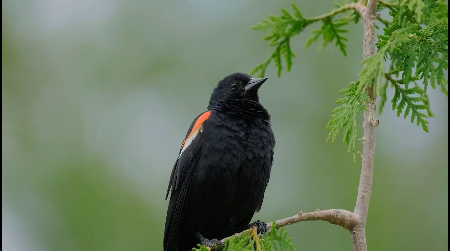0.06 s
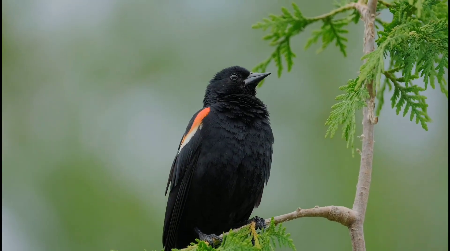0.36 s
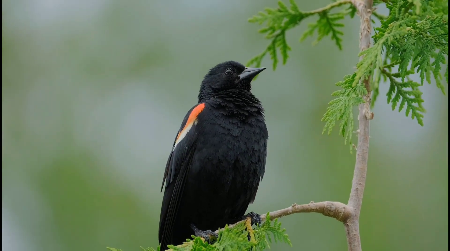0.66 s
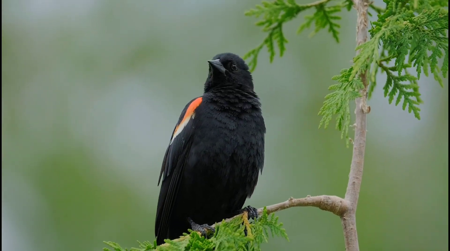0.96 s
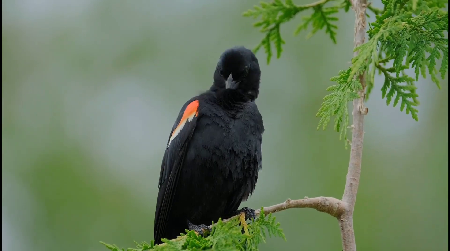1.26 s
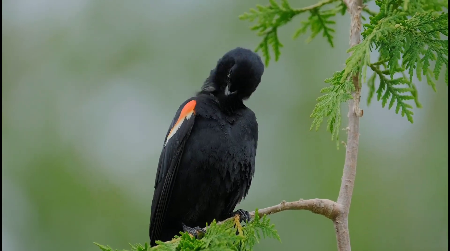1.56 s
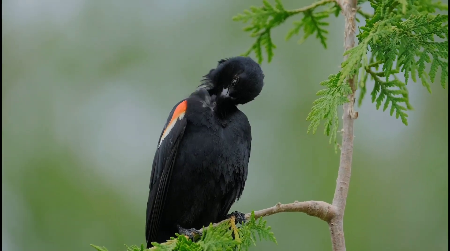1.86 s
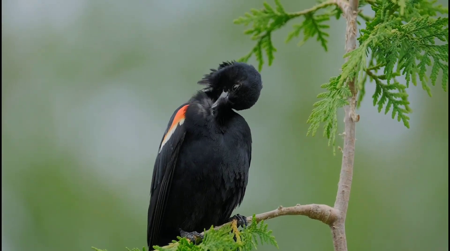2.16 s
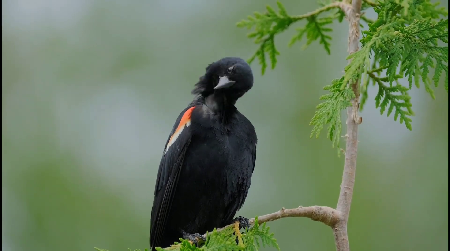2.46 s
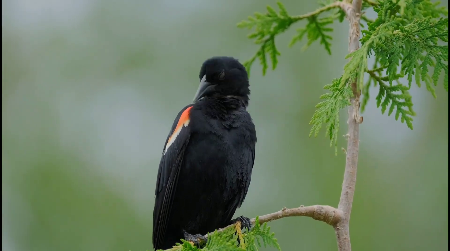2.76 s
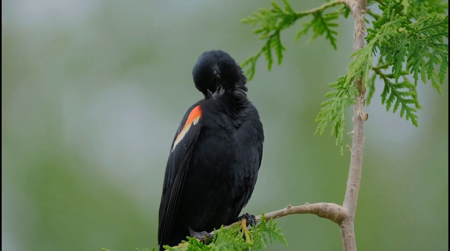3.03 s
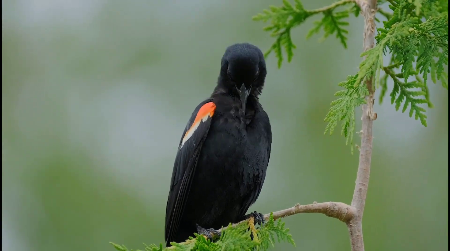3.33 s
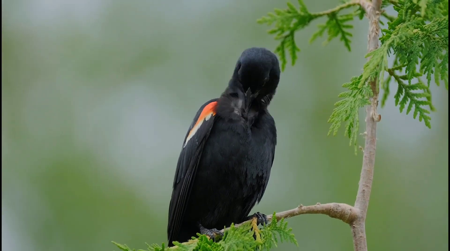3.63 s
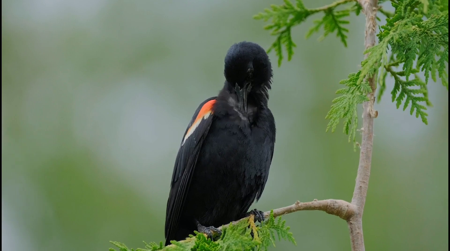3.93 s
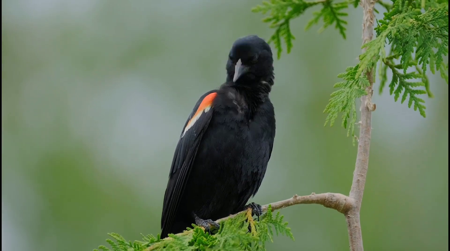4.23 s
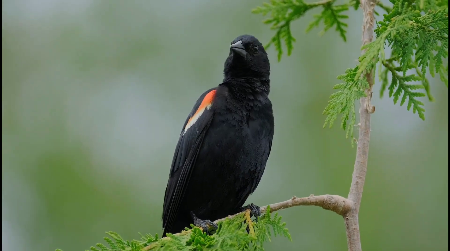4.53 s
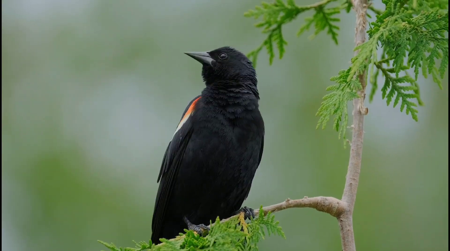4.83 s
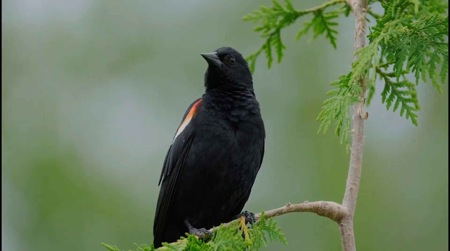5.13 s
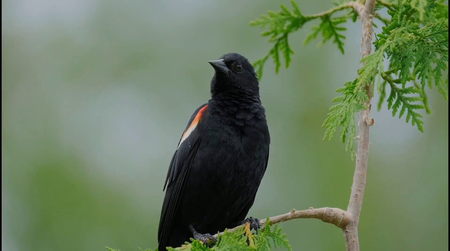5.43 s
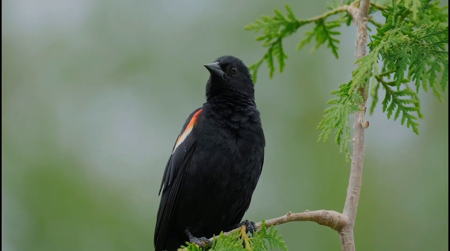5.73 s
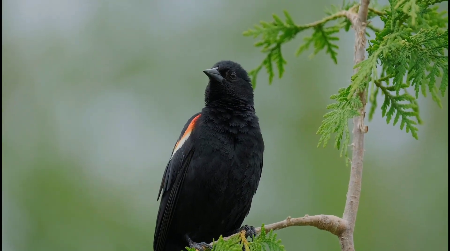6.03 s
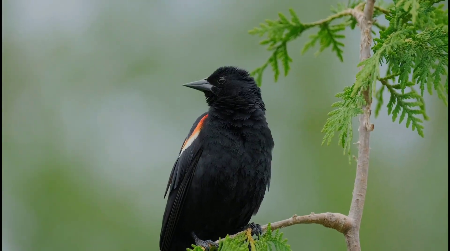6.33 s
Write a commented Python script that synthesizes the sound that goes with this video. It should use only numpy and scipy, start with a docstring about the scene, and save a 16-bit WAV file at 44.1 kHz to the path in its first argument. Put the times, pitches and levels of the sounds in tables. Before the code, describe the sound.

A blackbird sings close to the microphone outdoors. It opens with a two-toned note and a quick run of nasal calls, then moves through arched chirps, clear whistles, short rasps and two high falling slurs. A buzz lifts into a burst of loud chirps, followed by more whistles and rasps. A few faint scratchy chips end the song, over a faint steady hiss with a slight echo from the trees.

```python
"""A two-voiced note and a run of nasal calls open a songbird's song, close by over a faint outdoor hiss.
Arched chirps, whistles, rasps, high falling slurs, a buzz, slides and a few faint chips follow.
The two sides of its syrinx are oscillators driven by air: alone each gives a nearly pure tone,
together they beat and make combination tones. Ground, branches and trees return weak reflections;
the recorder rounds the peaks and cuts the bass."""
import sys
import numpy as np
from scipy import signal
from scipy.fft import rfft, irfft, next_fast_len
from scipy.io import wavfile
from scipy.ndimage import uniform_filter1d, map_coordinates

SR = 44100
rng = np.random.default_rng(int(sys.argv[2]) if len(sys.argv) > 2 else 0)


def persist_wave(psi):
    """Save psi, clipped to +-1, as 16-bit WAV."""
    counts = np.round(np.clip(psi, -1, 1) * 32767).astype(np.int16)
    wavfile.write(sys.argv[1], SR, np.atleast_2d(counts).T)


N = 290619


def amp(db):
    """Amplitude ratio of a level in decibels."""
    return 10 ** (np.asarray(db) / 20)


def along(points, hz):
    """Interpolation of (frequency, value) points on a logarithmic frequency axis."""
    frequencies, values = np.transpose(points)
    return np.interp(np.log(hz + 1), np.log(frequencies), values)


def contours(rows, t):
    """Interpolation of each column after the time, smoothed by a 3 ms moving average."""
    times, *columns = np.transpose(rows)
    return [uniform_filter1d(np.interp(t, times, column), size=130) for column in columns]


def wobble(t, rate):
    """Low-pass noise: a spline through rate random knots a second."""
    position = (t - t[0]) * rate
    return map_coordinates(rng.standard_normal(int(position[-1]) + 4), [position])


def filtered(x, response):
    """Linear filtering: the spectrum of x times a frequency response."""
    size = next_fast_len(N + SR // 2)
    return irfft(rfft(x, size) * response(np.fft.rfftfreq(size, 1 / SR)), size)[:N]


def gate(t, start, end, edge):
    """Window with raised-cosine edges centred on start and end."""
    u = np.clip(np.minimum(t - start, end - t) / edge + .5, 0, 1)
    return np.sin(np.pi / 2 * u) ** 2


def span(start, length):
    """Sample times of a note, and its progress from 0 to 1."""
    t = np.arange(max(int(start * SR), 0), min(int((start + length) * SR), N)) / SR
    return t, np.linspace(0, 1, len(t))


def arch(u, crest, rise, fall, bend_up=2, bend_down=2):
    """Power-law arch: zero at the crest, lower by rise at the start and by fall at the end."""
    before = np.maximum(1 - u / crest, 0)
    after = np.maximum((u - crest) / (1 - crest), 0)
    return -rise * before ** bend_up - fall * after ** bend_down


# Spectrum of the outdoor hiss: (frequency [Hz], relative spectral level [dB])
AIR_SPECTRUM = [(59, -68.5), (100, -39), (552, -29.5), (600, -34.5), (995, -19.5), (1180, -21),
                (1580, -6.5), (2570, -4.5), (2980, -3.5), (3310, -7), (4090, -6), (4450, -7.5), (9900, -7),
                (13600, -10.5), (15400, -18.5)]
def air(level_db=-64.37, drift_db=0.36):
    """Spectrally shaped Gaussian noise makes a faint, nearly steady hiss."""
    hiss = filtered(rng.standard_normal(N), lambda hz: amp(along(AIR_SPECTRUM, hz)))
    return hiss / hiss.std() * amp(level_db + drift_db * wobble(np.arange(N) / SR, 1))


# Warbles imposed on whichever note is sounding:
# (first crest [s], end [s], first rate [Hz], last rate [Hz], pitch swing [Hz], level swing [dB])
WARBLES = [(1.033, 1.082, 127, 51, 220, 10.5), (2.299, 2.345, 48, 100, 321.7, 5.5),
           (2.424, 2.472, 128, 84, 340, 5), (2.54, 2.59, 130, 120, 310, 2),
           (2.672, 2.702, 140, 102, 300, -10), (2.943, 2.99, 136, 112, 300, -9.5),
           (3.196, 3.368, 207, 180, 175.5, 4), (4.796, 4.875, 57, 92, 515, 4),
           (6.014, 6.073, 300, 273, 80, 2)]
def warble(t, fade_share=0.94):
    """Frequency and amplitude modulation by the fast muscles of the syrinx starts at once and eases off."""
    hz, db = np.zeros(len(t)), np.zeros(len(t))
    for start, end, first_rate, last_rate, swing_hz, swing_db in WARBLES:
        age, length = t - start, end - start
        cycle = np.cos(2 * np.pi * age * (first_rate + (last_rate - first_rate) * age / length / 2))
        easing = np.clip((end - t) / (fade_share * length) + .5, 0, 1)
        depth = easing * gate(t, start - .002, end + length, edge=0.0072)
        hz += swing_hz * depth * cycle
        db += depth * (swing_db * cycle - 0.07 * abs(swing_db))
    return hz, db


def membrane(t, hz, db, rough, flutter_db=0.9):
    """Phase and amplitude of one side of the syrinx; jitter and shimmer are heard as roughness."""
    swing_hz, swing_db = warble(t)
    jitter = rough * (0.82 * wobble(t, 1800) + .45 * wobble(t, 220)) + .002 * wobble(t, 99)
    pitch = (hz + swing_hz) * (1 + jitter)
    unsteady_db = flutter_db * wobble(t, 64) + 22 * rough * wobble(t, 290)
    shimmer = 2.9 * rough * wobble(t, 1700)
    return 2 * np.pi * np.cumsum(pitch) / SR, amp(db + swing_db + unsteady_db) * (1 + shimmer)


# Harmonics and combination tones: (multiple of low pitch [1], multiple of high pitch [1], weight [dB])
COMBINATIONS = [(2, 0, 1), (0, 2, -13.5), (1, 1, -2), (-1, 2, -8.5), (2, -1, -17.5), (3, -1, -15.5),
                (-2, 3, -12.5), (-1, 1, -5.5), (4, 0, -23)]
def note(t, sides, overtone_db, rough, third_db=-27, edge_s=0.0022):
    """Nonlinear oscillation: one side makes harmonics; two, sharing an air stream, intermodulate."""
    low_phase, low_size = membrane(t, *sides[0], rough)  # a side is (pitch [Hz], level [dB])
    tone = low_size * np.sin(low_phase)
    if len(sides) == 1:
        overtones = low_size * (np.sin(2 * low_phase) + amp(third_db) * np.sin(3 * low_phase))
    else:
        high_phase, high_size = membrane(t, *sides[1], rough)
        tone = tone + high_size * np.sin(high_phase)
        overtones = np.zeros(len(t))
        for m, n, db in COMBINATIONS:
            share = abs(m) / (abs(m) + abs(n))
            size = amp(db) * abs(low_size) ** share * abs(high_size) ** (1 - share)
            overtones += size * np.sin(m * low_phase + n * high_phase + 2 * np.pi * rng.random())
    rush = 1 + 2.5 * amp(overtone_db)  # a tighter syrinx hisses more
    turbulence = tone * rush * rng.standard_normal(len(t))
    edges = gate(t, t[0] + edge_s / 2, t[-1] - edge_s / 2, edge_s)
    return round(t[0] * SR), np.array([tone, amp(overtone_db) * overtones, turbulence]) * edges


# Response of the windpipe to the overtones: (frequency [Hz], gain [dB])
WINDPIPE = [(700, -41), (1500, -8.5), (3500, 8), (4800, 5), (6000, -10.5), (8000, -4), (11000, -7.5),
            (15000, -28.5)]
# Spectrum of air rushing through the syrinx: (frequency [Hz], relative spectral level [dB])
TURBULENCE = [(1000, -12.5), (2500, 2), (5000, -1.5), (8000, -4), (12500, -16.5), (15000, -20)]
def sing(notes, turbulence_db):
    """Source and filter: the notes add up, the windpipe colours their overtones, and the turbulence takes its
    own spectrum."""
    layers = np.zeros((3, N))
    for first_sample, sound in notes:
        layers[:, first_sample:first_sample + sound.shape[1]] += sound
    tone, overtones, turbulence = layers
    overtones = filtered(overtones, lambda hz: amp(along(WINDPIPE, hz)))
    turbulence = filtered(turbulence, lambda hz: amp(turbulence_db + along(TURBULENCE, hz)))
    return tone + overtones + turbulence


def slide(rows, gain_db, overtone_db, rough, bite_db=0, bite_s=0.02):
    """Glissando of one side or both; the bite is an onset transient of overtones."""
    t, _ = span(rows[0][0], rows[-1][0] - rows[0][0])
    controls = contours(rows, t)
    sides = [(hz, db + gain_db) for hz, db in zip(controls[::2], controls[1::2])]
    return note(t, sides, overtone_db + bite_db * np.exp((t[0] - t) / bite_s), rough)


# Two-voiced contour:
# (time [s], low pitch [Hz], low relative level [dB], high pitch [Hz], high relative level [dB])
OPENING = [(0, 3420, -22, 5056, -27), (.028, 3178, -26, 5125, -31.5), (.062, 3110, -21.5, 5024, -27),
           (.095, 3260, -21.5, 4780, -28.5), (.11, 3670, -29.5, 3710, -32)]
def opening_note():
    """Biphonation: the two sides start far apart and close in on one pitch."""
    return slide(OPENING, gain_db=1, overtone_db=-25, rough=.004)


def ground(song, gain_db=-30, delay_s=.014):
    """Reflection: the ground returns a faint copy, delayed by the longer path."""
    return amp(gain_db) * np.pad(song, (int(delay_s * SR), 0))[:N]


def branches(song, gain_db=-36, t60_s=.3, centre_hz=3500, half_width_hz=900):
    """Early scattering: nearby branches return a short flutter in the range of the chirps."""
    t = np.arange(SR // 2) / SR
    impulse = rng.standard_normal(len(t)) * amp(-60 * t / t60_s) * gate(t, 0.013, 1, edge=.01)
    scattered = signal.fftconvolve(song, impulse / np.linalg.norm(impulse))[:N]
    return filtered(scattered, lambda hz: amp(gain_db) / (1 + ((hz - centre_hz) / half_width_hz) ** 4))


# Decay among the foliage: (frequency [Hz], reverberation time [s])
FOLIAGE_DECAY = [(1500, 0.33), (3500, 1), (8000, 0.031)]
def trees(song, tail_db=-37, echo_db=-42, echo_s=.243, cutoff_hz=4600):
    """Reverberation and echo: foliage scatters a tail and far trees reflect once, both with less treble."""
    hz, t, spectra = signal.stft(rng.standard_normal(SR), SR, nperseg=256)
    decay = amp(-60 * t / along(FOLIAGE_DECAY, hz)[:, None])
    _, tail = signal.istft(spectra * decay, SR, nperseg=256)
    scattered = signal.fftconvolve(song, tail / np.linalg.norm(tail))[:N]
    echo = np.pad(song, (int(echo_s * SR), 0))[:N]
    returned = amp(tail_db) * scattered + amp(echo_db) * echo
    return filtered(returned, lambda f: 1 / np.sqrt(1 + (f / cutoff_hz) ** 6))


def held(t, hz, db, attack_s, bend_share, scoop_s=0.0064, drop_s=0.0047, release_s=0.0069):
    """Onset and release transients: pitch and level scoop up into a held note and drop out of it."""
    age, left = t - t[0], t[-1] - t
    bend = 0.14 * np.exp(-age / scoop_s) + 0.24 * np.exp(-left / drop_s)
    edge_loss_db = 24 * np.exp(-age / attack_s) + 16.5 * np.exp(-left / release_s)
    return hz * (1 - bend_share * bend), db - edge_loss_db


# Nasal notes, with pitches and levels at mid-note:
# (start [s], length [s], low pitch [Hz], low climb [Hz], high pitch [Hz], high climb [Hz],
#  low level [dB], low swell [dB], high level [dB], high fade [dB], overtone gain [dB])
NASALS = [ (0.159, 0.081, 2220, 648.5, 3186, 1166, -30, 11, -19, 5, -19),
          (0.279, 0.092, 2302, 151, 2936, 295, -36, 20, -26, 7, -7),
          (0.405, 0.091, 2380, 54.5, 3007, 340, -31.5, 16, -30.5, 0, -5.5),
          (0.537, 0.096, 2422, 72, 3085, 120, -35, 0, -39, 4, -5),
          (0.674, 0.11, 2433, -12, 3080, 128, -46.5, -1, -52, 8, -11)]
def nasals(attack_s=0.0042, tighten_db=7, flick_share=0.026, flick_db=3, flick_lead_s=.013, flick_s=0.0067):
    """Combination tones give a nasal timbre; the weight shifts to the low side before a last flick up."""
    for (start, length, low_hz, low_climb, high_hz, high_climb,
         low_db, swell_db, high_db, fade_db, overtone_db) in NASALS:
        t, u = span(start, length)
        u = u - .5  # progress counted from mid-note
        push = np.exp(-((t[-1] - flick_lead_s - t) / flick_s) ** 2)
        low_pitch = low_hz + low_climb * u
        high_pitch = (high_hz + high_climb * u) * (1 + flick_share * push)
        low = held(t, low_pitch, low_db + swell_db * u + flick_db * push, attack_s, bend_share=0.83)
        high = held(t, high_pitch, high_db - fade_db * u + flick_db * push, attack_s, bend_share=1.1)
        yield note(t, [low, high], overtone_db + tighten_db * u, rough=.008)


# Arched chirps: (start [s], length [s], crest pitch [Hz], crest position [0-1], rise [Hz], fall [Hz],
#  level [dB], loudest position [0-1], swell [dB], overtone gain [dB])
CHIRPS = [ (0.829, 0.1, 3740, 0.64, 1196, 986, -42.5, 0.69, 28, -26),
          (1.37, 0.035, 3040, .1, 50, 350, -63.5, 0.69, 7, -36),
          (1.562, 0.019, 4700, .05, 50, 550, -60, 0.54, 13, -36),
          (1.685, 0.078, 3776, 0.35, 420, 825, -32, .68, 39, -41),
          (1.845, .084, 3750, .31, 635, 1060, -22.5, 0.59, 42.5, -37),
          (3.503, 0.049, 3680, 0.28, 599, 1700, -9, 0.35, 23, -34.5),
          (3.584, .06, 3569, .25, 406.5, 1275, -10, 0.35, 15, -34),
          (3.676, .088, 3734, 0.37, 466, 552, -9.5, 0.61, 17, -39),
          (4.183, 0.088, 3760, .43, 463, 833, -15.5, 0.56, 28, -39),
          (4.313, 0.086, 3664, 0.45, 283, 955, -15.5, 0.63, 27, -37),
          (4.744, 0.052, 3034, 0.51, 644, 850, -25, 0.66, 3, -10.5),
          (6.057, 0.11, 3488, .41, 101, 670, -38, 0.68, 9, -36)]
def chirps(fade_db=28, collapse_db=11.5, collapse_rough=0.029):
    """Frequency sweep of one side: pitch and level arch, and the tone turns harsh as its pitch collapses."""
    for start, length, hz, crest, rise, fall, db, loudest, swell_db, overtone_db in CHIRPS:
        t, u = span(start, length)
        pitch = hz + arch(u, crest, rise, fall, bend_down=2.5)
        level = db + arch(u, loudest, swell_db, fade_db, bend_up=1.4, bend_down=3.3)
        collapse = u ** 6
        rough = 0.0005 + collapse_rough * collapse
        yield note(t, [(pitch, level)], overtone_db + collapse_db * collapse, rough)


# Drawn-out whistles: (start [s], length [s], first pitch [Hz], last pitch [Hz],
#  level [dB], fade [dB], attack time [s], overtone gain [dB])
WHISTLES = [ (1.021, 0.076, 2360, 2670, -61.5, -3, 0.007, -30),
            (1.089, .13, 2770, 2400, -51.5, 21.5, 0.0072, -33),
            (1.997, 0.23, 2702, 2410, -22.5, 1.5, .034, -41),
            (4.451, .202, 2763, 2453, -20.5, 4.5, 0.015, -40.5)]
def whistles(waver_share=0.0041, waver_per_s=28):
    """Nearly sinusoidal oscillation of one side, wavering a little on a linear glide."""
    for start, length, first_hz, last_hz, db, fade_db, attack_s, overtone_db in WHISTLES:
        t, u = span(start, length)
        glide = (first_hz + (last_hz - first_hz) * u) * (1 + waver_share * wobble(t, waver_per_s))
        side = held(t, glide, db - fade_db * u ** 2, attack_s, bend_share=.45)
        yield note(t, [side], overtone_db, rough=.001)


# Short harsh notes: (start [s], length [s], crest position [0-1], low crest [Hz], high crest [Hz],
#  low sag [share of pitch], low level [dB], high level [dB], low loudest position [0-1],
#  high loudest position [0-1], overtone gain [dB], roughness [0-1])
RASPS = [ (2.287, 0.065, .03, 2397, 4000, .33, -32.5, -25.5, 0.18, 0.26, -22.5, 0.05),
         (2.403, 0.064, 0.26, 2515, 4350, 0.18, -24, -26, 0.42, 0.092, -24, 0.03),
         (2.514, 0.074, .33, 2901, 4650, .22, -18, -20, 0.5, 0.082, -22.5, .02),
         (3.803, 0.089, .45, 1836, 3550, .08, -36, -30, 0.6, 0.22, -24.5, .03),
         (4.703, 0.047, 0.72, 2370, 3500, .05, -39.5, -26, 0.74, 0.92, -5.5, 0.08),
         (4.784, 0.091, 0.087, 2788, 3900, .2, -27, -30, .25, 0.064, -11, 0.08),
         (4.959, 0.053, 0.69, 2413, 3480, .03, -37, -26, 0.63, 0.85, -1.5, 0.06),
         (5.99, 0.074, 0.07, 1965, 3950, 0.12, -56, -37.5, 0.34, 0.75, -32, 0.03)]
def rasps(rise_share=.42, high_sag_ratio=1.8, swell_db=40.5, fade_db=20):
    """Aperiodic vibration: both sides sweep roughly to a crest and sag, each swelling in its own time."""
    for (start, length, crest, low_hz, high_hz, sag,
         low_db, high_db, low_at, high_at, overtone_db, rough) in RASPS:
        t, u = span(start, length)
        low = low_hz * (1 + arch(u, crest, rise_share, sag, bend_up=0.55, bend_down=1.4))
        high_sag = high_sag_ratio * sag
        high = high_hz * (1 + arch(u, crest, rise_share, high_sag, bend_up=0.94, bend_down=0.77))
        low_level = low_db + arch(u, low_at, swell_db, fade_db, bend_down=2.6)
        high_level = high_db + arch(u, high_at, swell_db, fade_db, bend_down=1.3)
        yield note(t, [(low, low_level), (high, high_level)], overtone_db, rough)


# Contour shared by the slurs:
# (time since the sides meet [s], low pitch [Hz], low relative level [dB], high relative level [dB])
SLUR_CONTOUR = [(-.105, 4806, -73, -48), (-.088, 5000, -58.5, -39), (-.055, 4950, -52.5, -30.5),
                (-.038, 4397, -29, -24.5), (-.016, 4210, -14, -18), (.006, 4300, -23.5, -40.5),
                (.032, 4110, -15.5, -42), (.055, 3756, -4.5, -21.5), (0.065, 3490, -12, -12.5),
                (0.077, 3297, -12.5, -15), (.095, 3147, -18, -20), (.106, 2799, -35.5, -37)]
# Falling slurs: (meeting time [s], gain [dB], high lead-in gain [dB], pitch shift [Hz], beat rate [Hz])
SLURS = [(2.753, -1, 3, -14, 215), (3.033, 0.6, -3, 30.5, 318)]
def slurs(top_hz=6393, scoop_hz=480, landing_hz=4560, parting_s=(.03, 0.096)):
    """Beating: the high side arches down onto the low one; they fall in unison, then part and beat."""
    first_s, last_s = SLUR_CONTOUR[0][0], SLUR_CONTOUR[-1][0]
    for meet, gain_db, lead_db, shift_hz, beat_hz in SLURS:
        t, u = span(meet + first_s, last_s - first_s)
        age = t - meet
        low, low_db, high_db = contours(SLUR_CONTOUR, age)
        descent = top_hz + arch(1 - age / age[0], 0.13, scoop_hz, top_hz - landing_hz)
        parting = low + beat_hz * np.interp(age, parting_s, [0, 1])
        high = np.where(age < 0, descent, parting)
        entry_rough = 0.024 * gate(age, -.08, -0.064, edge=0.018)
        parting_rough = .012 * gate(age, 0.024, 0.031, edge=0.0072)
        overtone_db = -23 + arch(u, crest=0.59, rise=0, fall=4.8, bend_down=1)
        sides = [(low + shift_hz, low_db + gain_db),
                 (high + shift_hz, high_db + gain_db + lead_db * (age < 0))]
        yield note(t, sides, overtone_db, rough=0.0058 + entry_rough + parting_rough)


# Contour of the buzz: (time [s], pitch [Hz], relative level [dB])
BUZZ = [(3.192, 2524, -32), (3.202, 2613, -27), (3.224, 2638, -20.5), (3.306, 2689, -17.5),
        (3.366, 2767, -20), (3.396, 2893, -17), (3.406, 3170, -26), (3.418, 3476, -16.5),
        (3.428, 3502, -13), (3.44, 3362, -12), (3.452, 2710, -22), (3.456, 2615, -33)]
def buzz():
    """Modulation sidebands: a fast warble makes a long note buzz before it lifts into a chirp."""
    return slide(BUZZ, gain_db=3.5, overtone_db=-36, rough=0.0012)


# Contour of the high whistle: (time [s], pitch [Hz], relative level [dB])
HIGH_SLIDE = [(3.937, 7387, -51.5), (3.947, 7327, -43), (3.993, 6070, -35.5), (4.047, 5980, -36.5),
              (4.063, 7190, -53.5), (4.075, 6896, -44), (4.093, 5057, -33), (4.109, 4535, -31),
              (4.124, 4023, -39)]
def high_slide():
    """Glissando of one side: a thin whistle falls, springs back and falls further."""
    return slide(HIGH_SLIDE, gain_db=3, overtone_db=-25, rough=.0014)


# Contour of the long whistle: (time [s], pitch [Hz], relative level [dB])
LONG_SLIDE = [(5.006, 2877, -37.5), (5.014, 3250, -32.5), (5.072, 3570, -23), (5.116, 3420, -26),
              (5.138, 3450, -32.5), (5.164, 3343, -27), (5.22, 3136, -36.5), (5.272, 3043, -31),
              (5.286, 2727, -53)]
def long_slide():
    """Onset transient: a bite of harmonics clears into a whistle that rises and slowly sinks."""
    return slide(LONG_SLIDE, gain_db=2.5, overtone_db=-18, rough=0.0045, bite_db=27)


# Strokes of the faint chips:
# (start [s], length [s], first pitch [Hz], middle pitch [Hz], last pitch [Hz], level [dB])
CHIPS = [ (5.616, .02, 4930, 2502, 4200, -46), (5.636, 0.023, 2510, 2440, 2790, -50),
         (5.639, .033, 4455, 4400, 4970, -46), (5.676, 0.0075, 4890, 2910, 2563, -46.5),
         (5.802, 0.037, 4820, 2507, 4320, -46), (5.832, 0.0061, 2680, 2495, 2450, -41),
         (5.838, 0.02, 4525, 3823, 3020, -43.5), (5.857, 0.0094, 3350, 4610, 4360, -45),
         (5.867, 0.011, 4460, 2732, 3940, -44.5), (6.235, 0.0067, 4260, 4210, 4030, -42.5),
         (6.244, 0.02, 4070, 4130, 3830, -47), (6.272, 0.021, 4073, 3010, 2160, -41.5),
         (6.295, .023, 3230, 2814, 2210, -40), (6.322, .026, 2570, 2745, 3700, -42)]
def chips(taper_db=9):
    """Random modulation broadens each quick parabolic sweep into a scratch, loudest near its middle."""
    for start, length, first_hz, middle_hz, last_hz, db in CHIPS:
        t, u = span(start, length)
        parabola = np.polyfit([0, .5, 1], [first_hz, middle_hz, last_hz], 2)
        level = db + 3 * wobble(t, 300) + arch(u, 0.37, taper_db, taper_db)
        yield note(t, [(np.polyval(parabola, u), level)], overtone_db=-27, rough=0.052)


def scene():
    """Superposition of the bird, its reflections and the outdoor hiss."""
    slides = [buzz(), high_slide(), long_slide()]
    opening = opening_note()
    song = sing([*chirps(), *whistles(), *slides], turbulence_db=-35.5)
    song += sing([opening, *nasals()], turbulence_db=-33)
    song += sing(slurs(), turbulence_db=-37.5)
    song += sing(rasps(), turbulence_db=-26)
    song += sing(chips(), turbulence_db=-17.5)
    song += ground(song)
    return (song + branches(song) + trees(song) + air())[None]


def record(dry, headroom=1.2, bass_cut_hz=1120, bass_db=-16, top_hz=15550):
    """Saturation in the preamplifier rounds the peaks; a steep bass shelf and a band limit follow."""
    rounded = headroom * np.tanh(dry[0] / headroom)
    shelf = lambda hz: 1 - (1 - amp(bass_db)) / (1 + (hz / bass_cut_hz) ** 10)
    return filtered(rounded, lambda hz: shelf(hz) * (hz < top_hz))[None]


dry = scene()
out = record(dry)
persist_wave(out)
```